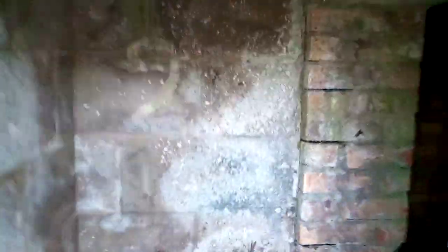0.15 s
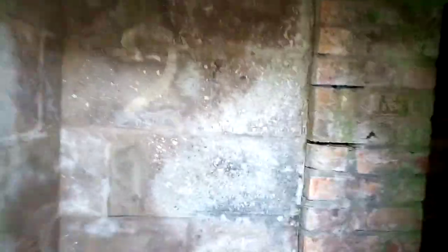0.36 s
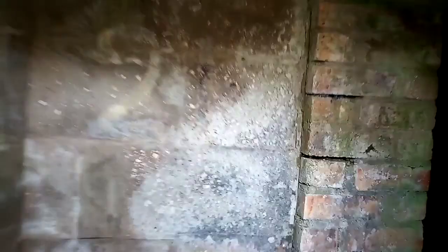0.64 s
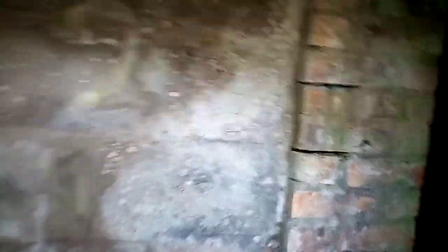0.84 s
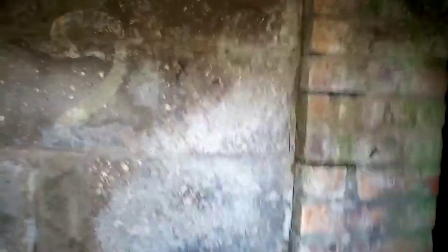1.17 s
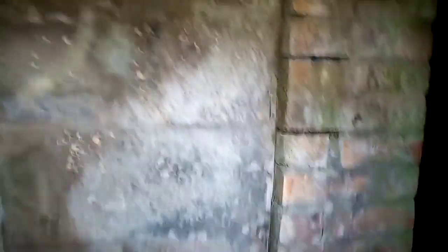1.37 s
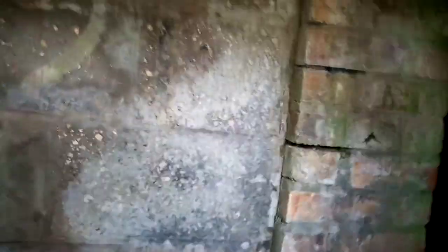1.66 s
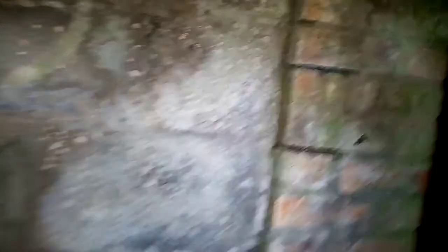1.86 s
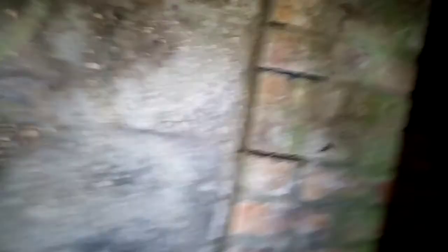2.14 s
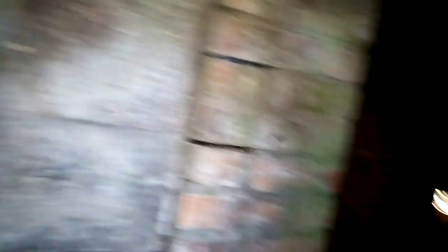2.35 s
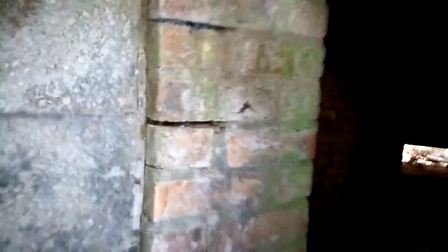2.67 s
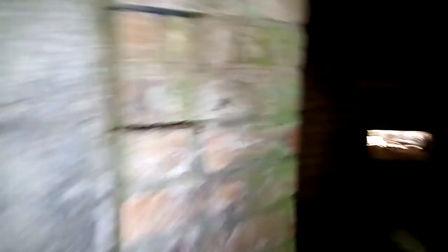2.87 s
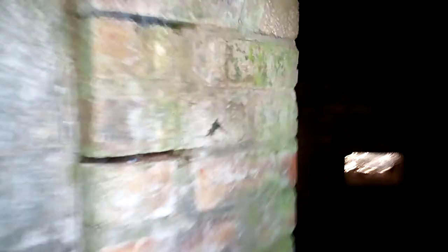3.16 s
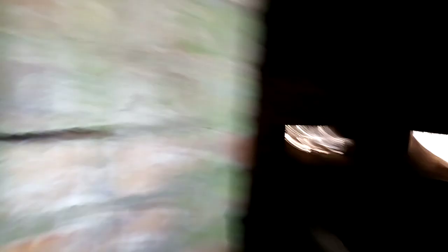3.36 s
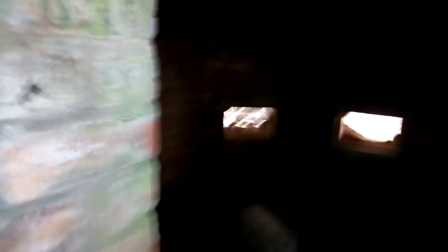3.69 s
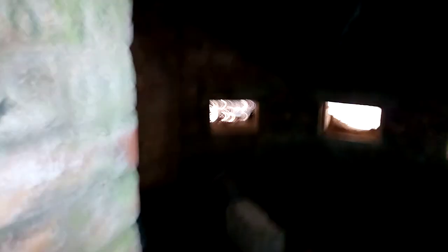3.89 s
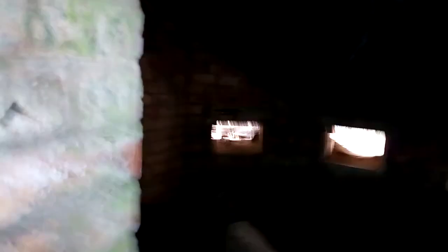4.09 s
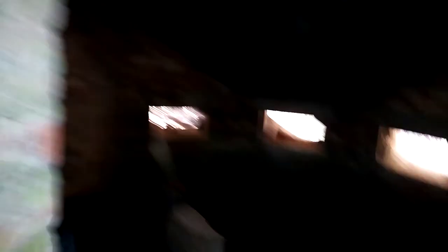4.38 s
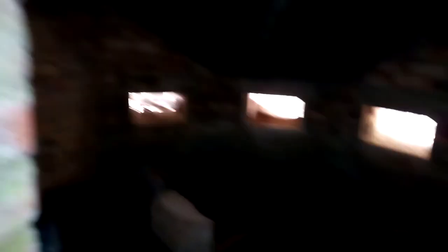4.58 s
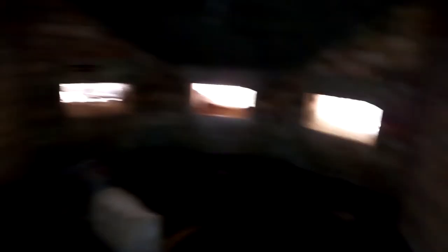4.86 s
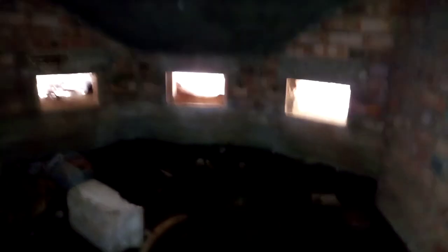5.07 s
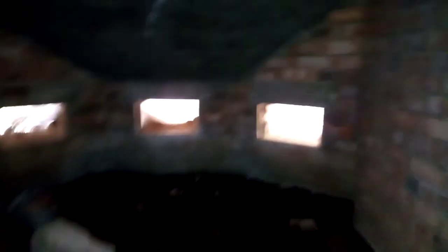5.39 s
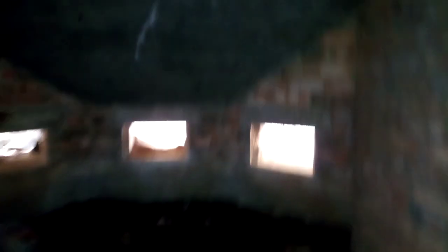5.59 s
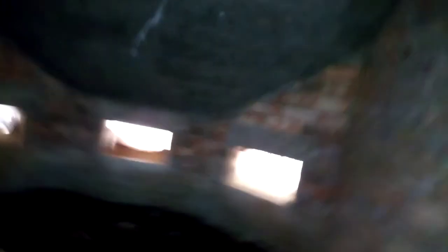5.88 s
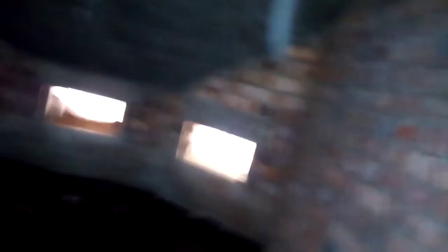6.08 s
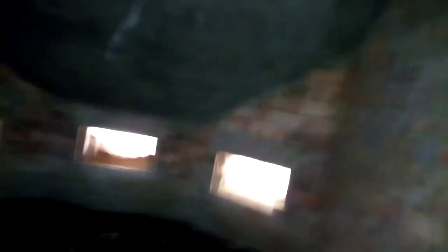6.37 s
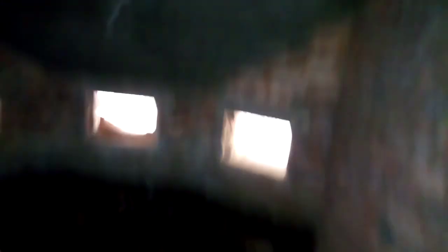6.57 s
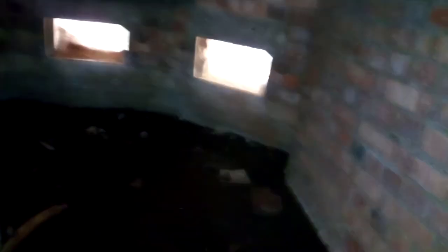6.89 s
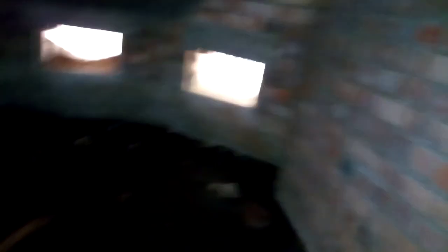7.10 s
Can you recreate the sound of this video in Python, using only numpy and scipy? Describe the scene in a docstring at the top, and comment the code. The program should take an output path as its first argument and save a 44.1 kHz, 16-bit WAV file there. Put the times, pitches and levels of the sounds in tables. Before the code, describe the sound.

Shoes scrape, slip and crunch on loose grit in a bare brick room, with soft heel thuds, stone cracks and crackling cloth.

```python
"""Slow steps inside a small bare brick-and-concrete shelter, heard by one microphone.
A cluster of scuffs, slips and thuds fills the first second; shorter steps follow near 1.7, 2.3 and 3.3 s.
A stone snaps hardest at 4.7 s, then the feet grind and snap grit again from 5.7 s to the end.
Soles and grit are shaped noise, stones and heels decaying modes; slips, snaps and thuds ring the hard walls.
A jacket, shaped crackling noise, rustles close by all the while over faint still air."""
import sys
import numpy as np
from scipy import signal
from scipy.io import wavfile
from scipy.ndimage import uniform_filter1d, map_coordinates

SR = 44100
rng = np.random.default_rng(int(sys.argv[2]) if len(sys.argv) > 2 else 0)


def store_pcm(level_fs):
    """Save levels as 16-bit WAV."""
    pcm = np.round(np.clip(level_fs, -1, 1) * 32767).astype(np.int16)
    wavfile.write(sys.argv[1], SR, np.atleast_2d(pcm).T)


N = 319237  # samples

# Foot movements, with the jacket moving along. Each row: start of full strength in s, hold in s,
# rise and fall in s for 20 dB (before each layer stretches them), grinding level in dB,
# pitch of the rolling grit in Hz, shudder of the rubber in dB, rumble of the slab in dB,
# pitch of the shudder in Hz, rustle in dB, top octave against the rustle in dB
# (higher when the cloth is near the microphone).
FOOT_MOVES = [(.072, 0.022, 0.074, 0.09, -49.5, 2380, -59, -84, 261, -42.5, -5),
              (0.205, 0.027, 0.11, 0.087, -45, 1810, -50, -66, 260, -43.5, -9),
              (0.423, 0.0074, 0.12, 0.035, -40, 1180, -41.5, -62, 324, -37.5, -13),
              (0.597, 0.023, 0.041, .03, -45, 2180, -45.5, -70, 302, -37, -20),
              (0.631, 0.052, 0.066, 0.12, -34, 1840, -37, -49, 191, -30, -21),
              (.668, .03, .04, 0.071, -36.5, 1740, -35.5, -50, 202, -41, -17),
              (0.734, 0.029, 0.12, 0.18, -31.5, 1900, -32.5, -41.5, 220, -34.5, -11),
              (.8, .015, .04, 0.086, -45, 1720, -56, -51, 230, -40, -12),
              (.854, 0.011, 0.083, 0.04, -40.5, 1320, -45, -49, 260, -50, -4),
              (0.894, 0.0066, .03, 0.021, -45, 1490, -51, -43, 216, -51, -10),
              (1.05, 0.016, 0.093, 0.065, -65, 1700, -78, -74, 201, -61, -1),
              (1.42, 0.011, 0.52, 0.033, -72, 1830, -66, -69, 188, -52, -14),
              (1.74, 0.14, 0.08, 0.07, -37.5, 1170, -43, -56, 210, -36, -11.5),
              (2.006, 0.016, 0.039, 0.057, -42.5, 1190, -45.5, -56, 210, -36.5, -9),
              (2.306, 0.0068, 0.012, 0.14, -94, 1400, -48.5, -38.5, 168, -40.5, -10),
              (2.39, 0.024, 0.09, 0.034, -95, 1410, -60.5, -57, 190, -60, -20),
              (2.95, 0.04, 0.073, 0.25, -80, 2080, -62.5, -78, 215, -58, -23),
              (3.13, 0.01, 0.38, 0.28, -49.5, 1750, -72, -59, 202, -47, -18),
              (3.248, 0.011, 0.014, 0.059, -41, 1770, -51, -47, 171, -45, -12),
              (3.291, 0.0082, 0.039, 0.017, -42.5, 2300, -46, -53, 180, -46, -24),
              (3.338, 0.0072, 0.03, 0.017, -39.5, 890, -54, -48, 204, -42.5, -24),
              (3.386, 0.013, 0.032, 0.053, -38, 2100, -41.5, -40, 167, -39.5, -20),
              (3.452, 0.17, 0.051, 0.11, -41.5, 1870, -43, -46, 200, -44, -15),
              (3.68, 0.017, 0.036, 0.034, -70, 2570, -68, -75, 200, -50.5, -15),
              (3.824, 0.019, 0.2, 0.12, -56.5, 1710, -63, -94, 242, -58, -18),
              (3.985, 0.0041, 0.039, 0.047, -43.5, 1110, -43, -40.5, 171, -43.5, -7),
              (4.02, 0.019, 0.15, 0.3, -54.5, 1150, -60.5, -68, 180, -48.5, -5),
              (4.244, 0.022, 0.18, 0.4, -51, 1360, -61.5, -69, 186, -47, -11.5),
              (4.356, 0.041, .06, 0.4, -95, 1540, -61.5, -79, 334, -53, -34),
              (4.491, 0.01, 0.052, 0.12, -93, 1720, -59.5, -74, 237, -50, -42),
              (4.712, 0.0025, 0.035, 0.2, -62, 2500, -51.5, -60, 375, -45.5, -19),
              (4.832, 0.0057, 0.056, 0.063, -46.5, 2270, -50.5, -81, 318, -48, -21),
              (4.955, 0.011, 0.17, 0.16, -61.5, 1430, -66, -64.5, 324, -58, -20),
              (5.125, 0.0066, 0.11, 0.031, -64.5, 1370, -67, -90, 364, -76, -35),
              (5.585, .01, 0.023, 0.11, -64, 2120, -73, -66, 285, -56.5, -18),
              (5.74, 0.017, 0.022, 0.087, -53, 940, -58, -85, 286, -55, -10),
              (5.82, 0.021, .07, 0.057, -48.5, 2000, -55, -75, 254, -46.5, -16),
              (5.849, 0.2, 0.018, .1, -46.5, 1080, -49.5, -60, 197, -47, -19),
              (5.955, 0.031, 0.042, 0.075, -61, 1260, -64, -65, 198, -50, -8),
              (6.09, 0.028, 0.087, 0.13, -40, 1820, -38.5, -51, 180, -33, -10.5),
              (6.199, 0.11, 0.18, 0.23, -49.5, 1090, -54.5, -60, 247, -41.5, -6),
              (6.515, 0.046, 0.024, .05, -58, 1540, -77, -83, 218, -49.5, 1),
              (6.565, 0.023, 0.11, 0.24, -75, 1720, -69, -81, 220, -43, -4.5),
              (6.783, 0.059, 0.022, 0.067, -44.5, 1210, -43, -56, 345, -33.5, -14),
              (6.912, 0.031, 0.12, 0.11, -38.5, 945, -35.5, -59, 263, -39.5, -6),
              (6.989, 0.0077, 0.11, 0.14, -36, 1560, -38.5, -59, 194, -39.5, -11),
              (7.2, .04, 0.11, .1, -57, 1960, -58, -70, 238, -43.5, -9)]
# The body never rests between the scuffs. Each row: time in s, grinding in dB, shudder in dB,
# rumble in dB, rustle in dB, top octave against the rustle in dB.
BODY_SWAY = [(0, -50.5, -66, -81, -50.5, -5), (.33, -72, -103, -72, -46, -10),
             (.5, -57.5, -73, -81, -57.5, 0), (.57, -64, -77, -85, -53, -3), (.95, -68, -62, -64, -52, -9),
             (1.22, -61, -72, -74.5, -51.5, -11), (1.3, -70, -72, -68, -58, -13),
             (1.52, -65, -71, -80, -54, -10), (1.67, -57, -72, -78, -51, -19),
             (1.93, -65, -55.5, -68, -52, -5), (2.15, -55.5, -69, -74, -49, -4.5),
             (2.55, -52.5, -70.5, -72.5, -54.5, -18), (2.85, -90, -71, -79, -55.5, -18),
             (3.2, -58, -58, -78, -56, -16), (3.72, -81, -66.5, -72, -53.5, -11),
             (3.92, -74, -65.5, -76, -57, -29), (4.16, -88, -74, -73, -61, -20),
             (4.55, -64, -71, -74, -80, -23), (4.62, -94, -77, -71, -89, -8),
             (4.87, -65, -71, -75, -60, -14), (5.2, -100, -70, -79, -68, -16),
             (5.5, -97, -68.5, -69, -61.5, -16), (5.7, -60, -69, -77, -59, -17),
             (6.47, -68.5, -67.5, -73, -56, -20), (6.64, -82, -85, -77, -59, -3),
             (6.74, -91, -71, -80, -52, -9), (7.1, -61, -51, -57, -51.5, -4),
             (7.24, -52.5, -69, -71, -58, -16)]
# A sole slips and catches. Each row: start in s, peak in dB, time scale in s, centre in Hz, width in octaves.
SOLE_SLIPS = [(0.054, -25, 0.0089, 2380, 2.3), (0.063, -30, 0.011, 3020, 2.2),
              (0.076, -23.5, 0.014, 4400, 0.96), (0.086, -31, 0.011, 6660, 0.3),
              (0.377, -33.5, 0.024, 5460, 1.6), (0.402, -30, .01, 5960, .5),
              (0.427, -24, 0.0094, 3510, 2.2), (0.582, -27, 0.059, 5000, 0.62),
              (0.62, -16, 0.048, 2920, 1.6), (0.847, -34, 0.011, 2200, 2),
              (0.894, -31.5, 0.0083, 2000, 2.7), (2.035, -34, 0.021, 4740, 3.2),
              (2.301, -35, 0.016, 6200, 0.27), (2.303, -37, 0.014, 1930, 0.82),
              (3.24, -36, 0.035, 3100, 0.94), (3.293, -30, 0.014, 3160, 1.2),
              (3.322, -38, 0.023, 3100, 0.6), (3.382, -26.5, 0.021, 2400, 1.64),
              (3.452, -33, 0.015, 4870, 0.6), (3.95, -35, 0.021, 6100, 0.94),
              (4.704, -33, 0.14, 3180, 0.49), (4.821, -35, 0.028, 4720, 0.15),
              (4.839, -37, 0.012, 3180, 0.48), (5.066, -46.5, 0.18, 5500, 0.35),
              (5.736, -43.5, 0.019, 820, 0.25), (5.827, -35, 0.017, 2080, 0.57),
              (6.027, -27.5, 0.0056, 1920, 2.4), (6.067, -30, 0.0074, 5260, 0.85),
              (6.767, -37, 0.039, 6160, 0.3), (6.919, -15.5, 0.0089, 7050, 0.64),
              (6.97, -38, 0.023, 1840, 0.79), (7.086, -31.5, 0.0075, 6160, 0.45),
              (7.087, -27.5, 0.0044, 14900, .15), (7.175, -38.5, 0.018, 3180, 0.36)]
# Stones snapping. Each row: time in s, peak in dB, pitch as a ratio to the listed stone modes.
STONE_SNAPS = [(.0054, -32, 1.2), (.029, -37, 1.4), (0.1442, -31, 1.2), (.666, -18, 0.4),
               (0.7313, -20, 0.42), (.762, -18, 0.37), (0.853, -28, 0.74), (0.8936, -31, 1.3),
               (1.15, -36, 1.18), (1.24, -42, 0.54), (1.2716, -38, 1.2), (1.4317, -36, 1.2),
               (1.627, -38, 0.73), (1.657, -35, 1.5), (3.1144, -40, 2.3), (3.2038, -33, 1.1),
               (3.2099, -32.5, 1.5), (3.2273, -40, 2.7), (4.058, -35, 1.9), (4.2372, -33, 1.37),
               (4.315, -41, 1.8), (4.676, -30, 0.97), (4.6909, -20.5, 0.9), (4.709, -12, 1.025),
               (5.3208, -39.5, 1.6), (5.794, -37, 0.84), (5.956, -28, 0.62), (6.0279, -17, 1.14),
               (6.054, -23, 1.25), (6.083, -17, 1.37), (6.0956, -22.5, 0.86), (6.785, -32, 1.3),
               (6.8342, -28, 0.67), (6.9166, -18, 1.7), (6.92, -21, 1.35), (7.005, -24, 1.6),
               (7.1523, -30, 1.55)]
# Modes of a stone at pitch ratio 1. Each row: frequency in Hz, relative level in dB, 60 dB decay in s.
STONE_MODES = [(1510, -36, 0.0088), (2755, 0.5, 0.02), (4370, 18, 0.0046), (4850, 9.5, 0.0068),
               (6840, 5, 0.0056)]
# Heels landing. Each row: start in s, peak in dB, boom frequency in Hz, 60 dB decay in s.
HEEL_THUDS = [(0.411, -45, 268, 0.064), (0.649, -27.5, 199.7, 0.15), (1.766, -37, 240.8, 0.38),
              (2.303, -33, 101.6, 0.06), (2.355, -43.5, 71, 0.11), (3.079, -49, 359, 0.051),
              (3.255, -42.5, 90, 0.16), (3.397, -34.5, 79, 0.38), (3.459, -34, 91, 0.17),
              (3.755, -53, 200, 0.17), (3.858, -51, 200, 0.08), (3.982, -55, 175, 0.15),
              (4.236, -54, 160, 0.1), (4.687, -39, 349, 0.028), (4.709, -36, 334, 0.024),
              (4.831, -44.5, 345, 0.05), (4.937, -53, 400, 0.066), (5.113, -56, 335, 0.11),
              (5.841, -36, 233, 0.1), (6.777, -43, 340, 0.042), (6.817, -34, 430, .04),
              (6.844, -36, 383, .05), (6.896, -31, 238, 0.18)]
# A dragged sole holds one note. Each row: start in s, length in s, starting level in dB,
# centre in Hz, bandwidth of one filter pass in Hz.
SOLE_DRONES = [(0.625, 0.13, -33.5, 163, 23), (0.642, 0.13, -39.5, 557, 70),
               (0.643, 0.056, -31.5, 1780, 170), (.725, 0.064, -35, 1440, 150),
               (1.771, 0.087, -33.5, 1160, 73), (3.264, 0.22, -59, 360, 29), (3.435, 0.15, -45, 337, 60),
               (4.716, 0.21, -49.5, 2840, 690), (4.72, 0.063, -56, 3770, 250), (4.72, 0.06, -51, 1660, 150),
               (5.858, 0.34, -50, 173, 5.5), (5.873, 0.19, -46.5, 71, 12), (5.845, 0.099, -58, 348, 36),
               (6.027, 0.21, -43, 178, 17), (6.123, 0.074, -43, 80.4, 18), (6.346, 0.27, -67, 590, 32)]
# Noise spectra of the grit, the sole, the slab, the cloth, the finest cloth crackle and the still air.
# Each row: frequency in Hz, relative level in dB per Hz.
GRIT_SPECTRUM = [(240, -39), (400, -16), (475, -12.5), (582, -6.5), (698, -42), (788, -3.5), (995, -5.5),
                 (1450, -1.5), (1570, -2.5), (2800, -8), (4500, -9.5), (5850, -59), (9900, -120)]
SOLE_SPECTRUM = [(76, -46), (130, -9), (167, 1.5), (242, -1.5), (291, -2), (406, -6), (470, -5.5),
                 (600, -0.5), (780, -7.5), (1320, -120)]
SLAB_SPECTRUM = [(35, -29), (52, -4), (64, -4), (100, 0), (125, -0.5), (170, -14)]
CLOTH_SPECTRUM = [(700, -63), (1300, -20.5), (2300, -10.5), (3050, -11), (3600, -6), (4380, -2.5),
                  (5300, -1), (6540, 1), (8690, -10.5), (11000, -37.5), (14000, -41)]
CLOTH_TOP_SPECTRUM = [(9000, -2.5), (10500, -8), (13600, -6.5), (14200, -9), (14900, 6), (15900, 0)]
AIR_SPECTRUM = [(18, -34), (30, -14), (184, 1), (500, -4), (1000, 6), (1500, 4), (2350, 0), (2610, -29),
                (4300, -25), (4650, -24), (5310, -20), (6050, -28), (10200, -48), (16000, -21)]

# Each layer follows a scuff in its own time: lag in s, stretch of the rise, stretch of the fall.
GRIND_TIME, SHUDDER_TIME, RUMBLE_TIME = (0.00027, 0.68, 0.9), (0.0072, 0.47, 0.56), (0.014, 0.69, 0.33)
RUSTLE_TIME, TOP_TIME = (0.00052, 0.83, 0.6), (0.0035, 0.8, 0.46)
DRONE_RISE_S, DRONE_SAG_DB = 0.029, 7.5
SNAP_DELAY_S = 0.00101  # every crack sounds this long after its listed time
# every crack sets off a thin ring of the microphone near 15 kHz
MIC_RING_HZ, MIC_RING_DB, MIC_RING_T60_S = 15100, -9, .004
ROOM_T60_S, ROOM_DB, ROOM_DULL_HZ = 0.42, -12, 3540
AIR_DB = -75
BASS_HZ, TOP_HZ = 42.4, 15850


def undb(db):
    """The amplitude ratio of a level in decibels."""
    return 10 ** (np.asarray(db) / 20)


def unit(x):
    """Normalization to an RMS value of 1."""
    return x / np.sqrt(np.mean(x ** 2))


def walk(rate):
    """Low-passed random steps: levels held 1 / rate s, slewed twice, with an RMS value of 1."""
    hold = int(SR / rate)
    steps = np.repeat(rng.standard_normal(N // hold + 1), hold)
    slewed = uniform_filter1d(uniform_filter1d(steps, hold), hold)
    return unit(slewed[:N])


def grains(rate, scatter_db, smooth):
    """Shot noise: tiny breaks at random moments, some larger than most, over a share of even hiss."""
    hit = rng.random(N) < rate / SR
    size = undb(scatter_db * np.minimum(rng.exponential(size=N), 4))
    breaks = hit * rng.standard_normal(N) * size
    return np.sqrt(smooth) * rng.standard_normal(N) + np.sqrt(1 - smooth) * unit(breaks)


def patches(s, octave, rate, per_octave):
    """A smooth random field over time and pitch, with an RMS value of 1."""
    field = rng.standard_normal((400, 400))
    place = np.meshgrid(np.clip(octave * per_octave, 0, 399), np.clip(s * rate, 0, 399), indexing="ij")
    return unit(map_coordinates(field, place, order=3, mode="mirror"))


def colour(x, points, together_db, broad_db, narrow_db, rate, size=512, peak=None):
    """Time-varying filtering: the whole swells, octaves flicker, and narrow resonances come and go."""
    swelling = x * undb(together_db * walk(rate))
    f, s, spectrum = signal.stft(swelling, SR, nperseg=size, noverlap=size * 3 // 4)
    hz, db = np.transpose(points)
    octave = np.log2(np.maximum(f, 1))
    shape_db = np.interp(octave, np.log2(hz), db, left=-90, right=-90)[:, None]
    shape_db = shape_db + broad_db * patches(s, octave, rate / 3, 1.581)
    # the narrow resonances even out towards the treble
    evenness = 1 + (f[:, None] / 6000) ** 2
    shape_db += narrow_db * patches(s, octave, rate / 6, 9.0) / evenness
    if peak is not None:
        times, peak_hz, lift_db, width_octaves = peak
        distance = octave[:, None] - np.log2(np.interp(s, times, peak_hz))
        shape_db += lift_db * np.exp(-(distance / width_octaves) ** 2)
    _, shaped = signal.istft(spectrum * undb(shape_db), SR, nperseg=size, noverlap=size * 3 // 4)
    return unit(shaped[:N])


def moving(scuff_db, sway_db, lag_s, rise_stretch, fall_stretch):
    """Addition of powers: every scuff rises, holds and falls over the slow sway."""
    t = np.arange(0, N + 64, 32) / SR
    s, hold, rise, fall = (column[:, None] for column in np.transpose(FOOT_MOVES)[:4])
    early = np.maximum(s + lag_s - t, 0) / (rise * rise_stretch)
    late = np.maximum(t - s - lag_s - hold, 0) / (fall * fall_stretch)
    level_db = scuff_db[:, None] - 20 * np.minimum(early + late, 10)
    power = np.sum(undb(level_db) ** 2, axis=0)
    power += undb(np.interp(t, np.transpose(BODY_SWAY)[0], sway_db)) ** 2
    return np.interp(np.arange(N) / SR, t, np.sqrt(power))


def ring(hz, t60):
    """Free vibration of one mode, decaying exponentially by 60 dB in t60 seconds."""
    t = np.arange(int(t60 * SR) + 1) / SR
    return np.sin(2 * np.pi * hz * t) * np.exp(-np.log(1000) * t / t60)


def add(out, s, sound, peak_db):
    """Superposition: places a sound at s seconds with the given peak."""
    i = int(s * SR)
    sound = sound[:N - i]
    out[i:i + len(sound)] += sound * undb(peak_db) / np.abs(sound).max()


def scuffs():
    """Granular friction: grit rolls and crushes, loudest at the wandering pitch of the stones caught."""
    s, _, _, _, grind_db, grit_hz, *_ = np.transpose(FOOT_MOVES)
    _, sway_db, *_ = np.transpose(BODY_SWAY)
    times = np.arange(0, N, 256) / SR
    caught_hz = np.interp(times, s, grit_hz) * 2 ** (.2 * walk(40)[::256])
    caught = times, caught_hz, 3.5, .2  # lift in dB, width in octaves
    crush = grains(2500, 3.1, 0.52)
    grind = colour(crush, GRIT_SPECTRUM, 2.0, .4, 3.0, 45, size=1024, peak=caught)
    return grind * moving(grind_db, sway_db, *GRIND_TIME)


def weight():
    """Forced vibration under load: the rubber shudders and the slab rumbles."""
    s, *_, shudder_db, rumble_db, shudder_hz, _, _ = np.transpose(FOOT_MOVES)
    _, _, sway_shudder_db, sway_rumble_db, _, _ = np.transpose(BODY_SWAY)
    flex = s, shudder_hz, 6.0, .2  # lift in dB, width in octaves
    shudder = colour(grains(400, 2.8, .6), SOLE_SPECTRUM, 1.2, .4, 3.4, 20, size=4096, peak=flex)
    shudder = shudder * moving(shudder_db, sway_shudder_db, *SHUDDER_TIME)
    rumble = colour(rng.standard_normal(N), SLAB_SPECTRUM, 0.44, 0.89, 2.8, 9, size=8192)
    rumble = rumble * moving(rumble_db, sway_rumble_db, *RUMBLE_TIME)
    return shudder + rumble


def drones():
    """Stick-slip: catches of the sole come so fast that they sing in one narrow band, then sag."""
    out, catches = np.zeros(N), grains(1500, 1.8, 0.41)
    for s, length_s, db, hz, width_hz in SOLE_DRONES:
        i, t = int(s * SR), np.arange(int(length_s * SR)) / SR
        edges = [hz - width_hz / 2, hz + width_hz / 2]
        band = signal.butter(1, edges, "band", fs=SR, output="sos")
        # half a second of run-in lets the narrow filter settle
        run = catches[i - SR // 2:i + len(t)]
        note = unit(signal.sosfilt(band, signal.sosfilt(band, run))[-len(t):])
        edge = np.clip(np.minimum(t, length_s - t) / DRONE_RISE_S, 0, 1)
        out[i:i + len(t)] += note * edge * undb(db - DRONE_SAG_DB * t / length_s)
    return out


def slips():
    """Transient friction: bursts of crushing swell fast and die as the sole grips again."""
    out, crush = np.zeros(N), grains(5000, 3.2, .4)
    for s, peak_db, length_s, hz, width_octaves in SOLE_SLIPS:
        t = np.arange(int(3 * length_s * SR) + 9) / SR / length_s  # in time scales
        edges = np.clip(hz * 2 ** (np.array([-.5, .5]) * width_octaves), 100, 18000)
        band = signal.butter(2, edges, "band", fs=SR, output="sos")
        burst = signal.sosfilt(band, crush[int(s * SR):][:len(t)])
        swell = t ** 0.59 * np.exp(-3.2 * t)
        add(out, s, burst * swell[:len(burst)], peak_db)
    return out


def snaps():
    """Brittle fracture: each stone cracks, sheds splinters and rings its modes, a little differently."""
    out, size = np.zeros(N), SR // 20
    t = np.arange(size) / SR
    band = signal.butter(3, [900, 5800], "band", fs=SR, output="sos")
    splinters = signal.sosfilt(band, rng.standard_normal((len(STONE_SNAPS), size)))
    chances = rng.standard_normal((len(STONE_SNAPS), len(STONE_MODES)))
    mic_ring = undb(MIC_RING_DB) * ring(MIC_RING_HZ, MIC_RING_T60_S)
    for (s, peak_db, pitch), chance, dust in zip(STONE_SNAPS, chances, splinters):
        sound = dust * (undb(10.0) * np.exp(-t / 0.0029) + undb(-25.0) * np.exp(-t / 0.0043))
        for (hz, db, t60), c in zip(STONE_MODES, chance):
            mode_hz = min(hz * pitch * (1 + 0.0077 * c), .4 * SR)
            mode = ring(mode_hz, t60)[:size]
            sound[:len(mode)] -= undb(db + 0.8 * c) * mode
        sound[:len(mic_ring)] += mic_ring
        # the contact lasts a moment, longer for large stones, which rounds the attack
        contact = np.minimum(t * pitch / .00035, 1)
        add(out, s + SNAP_DELAY_S, sound * contact, peak_db)
    return out


def thuds():
    """Modal excitation by a soft push: a heel booms the slab, with a duller mode below and a knock above."""
    out = np.zeros(N)
    for s, peak_db, hz, t60 in HEEL_THUDS:
        boom = ring(hz, t60) + undb(-16.5) * ring(0.765 * hz, t60) + undb(-9.0) * ring(1.8 * hz, t60)
        push = np.minimum(np.arange(len(boom)) / (0.0059 * SR), 1)
        add(out, s, boom * push, peak_db)
    return out


def jacket():
    """Dry friction of fibres catching and letting go; the finest crackle carries only a short way."""
    rub = grains(3500, 1.6, 0.81)
    body = colour(rub, CLOTH_SPECTRUM, 1.4, .9, 3.8, 55, size=1024)
    top = colour(rub, CLOTH_TOP_SPECTRUM, 1.7, 1.4, 4.5, 60)
    *_, rustle_db, top_db = np.transpose(FOOT_MOVES)
    *_, sway_db, sway_top_db = np.transpose(BODY_SWAY)
    body_gain = moving(rustle_db, sway_db, *RUSTLE_TIME)
    top_gain = moving(rustle_db + top_db, sway_db + sway_top_db, *TOP_TIME)
    return body * body_gain + top * top_gain


def room(x):
    """Reverberation: dense echoes of hard walls a few metres apart, duller than the direct sound."""
    t = np.arange(SR // 2) / SR
    decay = np.exp(-np.log(1000) * t / ROOM_T60_S)
    tail = rng.standard_normal(len(t)) * decay * (t > .004)
    tail = signal.sosfilt(signal.butter(1, ROOM_DULL_HZ, fs=SR, output="sos"), tail)
    return signal.fftconvolve(x, tail / np.sqrt(np.sum(tail ** 2)))[:N] * undb(ROOM_DB)


def still_air():
    """Stationary background noise: faint shaped hiss whose bands flicker slightly."""
    return colour(rng.standard_normal(N), AIR_SPECTRUM, .5, 3.0, 2.5, 9.0, size=4096) * undb(AIR_DB)


def scene():
    """Superposition of sources: the hits ring the room, the rest is dry; one microphone feeds both sides."""
    hits = snaps() + slips() + thuds()
    feet = hits + room(hits) + scuffs() + drones() + weight()
    mono = feet + jacket() + still_air()
    return np.array([mono, mono])


def record(dry):
    """Band limitation: the microphone loses the deepest bass; the recorder cuts the top steeply."""
    thin = signal.sosfilt(signal.butter(3, BASS_HZ, "high", fs=SR, output="sos"), dry)
    return signal.sosfilt(signal.ellip(12, .2, 80, TOP_HZ, fs=SR, output="sos"), thin)


dry = scene()
out = record(dry)
store_pcm(out)
```